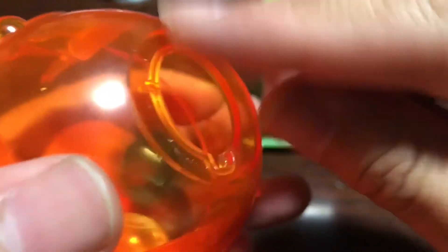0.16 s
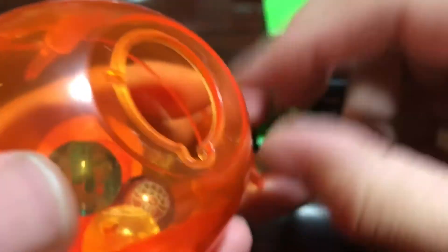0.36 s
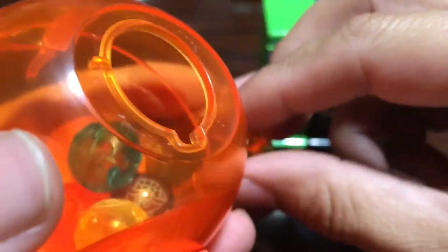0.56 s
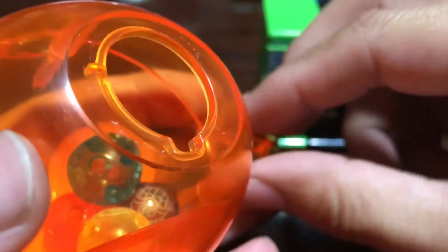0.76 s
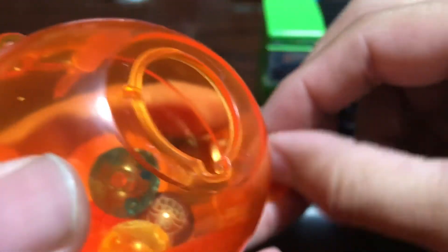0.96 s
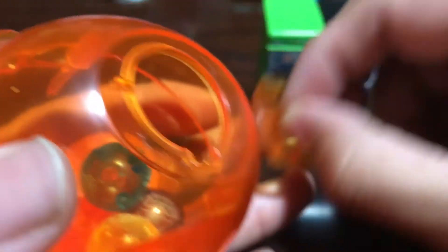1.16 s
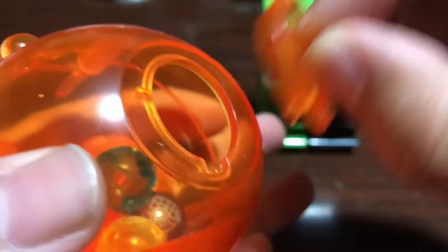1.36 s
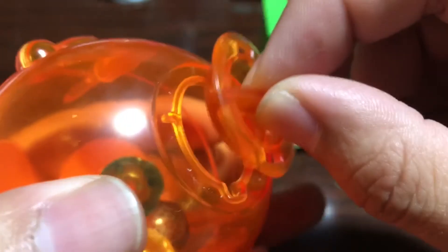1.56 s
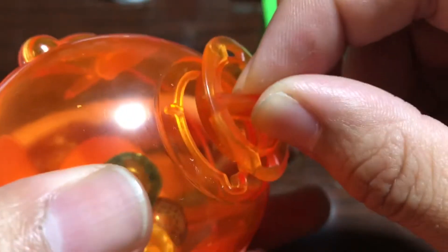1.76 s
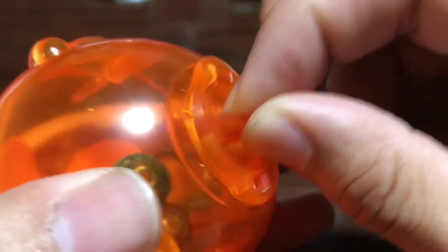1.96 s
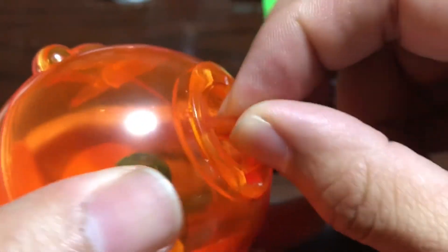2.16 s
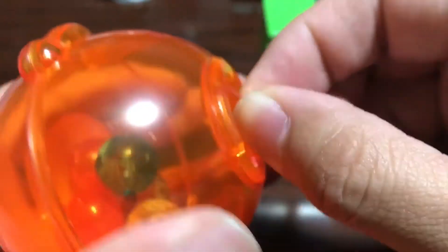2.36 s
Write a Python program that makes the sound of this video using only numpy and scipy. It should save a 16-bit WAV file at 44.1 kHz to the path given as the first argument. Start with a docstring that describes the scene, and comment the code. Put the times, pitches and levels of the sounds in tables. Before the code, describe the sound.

Small plastic balls clatter inside a hollow plastic dome, then a plastic cap snaps shut

```python
"""A small plastic ball scrapes through the tight port of a hollow plastic dome, while fingers rub on the shell.
It drops in and rattles against the shell and other balls; they roll and rattle again as the toy is tilted.
Then a plastic cap taps the rim of the port and is pressed home. It is heard close up, in a quiet small room.
Each blow is a sum of dying tones, a burst of coloured noise, a crack and the note of the air in the dome.
Rubbing, scraping and the still room are coloured noise; rolling is a shower of tiny blows."""
import sys
import numpy as np
from scipy import signal
from scipy.fft import rfft, irfft, next_fast_len
from scipy.io import wavfile
from scipy.ndimage import uniform_filter1d

SR = 44100
rng = np.random.default_rng(int(sys.argv[2]) if len(sys.argv) > 2 else 0)


def log_audio(samples):
    """Write samples as a 16-bit WAV file to the path given in sys.argv[1]."""
    # one column per channel
    frames = np.atleast_2d(samples).T
    # limit to full scale, then quantise
    limited = np.clip(frames, -1, 1)
    pcm = np.round(limited * 32767).astype(np.int16)
    wavfile.write(sys.argv[1], SR, pcm)


N = 105840   # length of the scene in samples

# main tones (modes) of the dome: (pitch [Hz], level [dB], time to fall by 60 dB [s])
DOME_MODES = [(1499, -0.5, 0.027), (1786, -8.5, .025), (2349, -1, 0.024), (2634, -1, .02),
              (2870, 0.5, 0.017), (3553, -1, .022), (4110, 1.5, 0.02), (4580, -11, .04), (5400, -2.5, .017),
              (6320, -2.5, .017), (7090, -6, .02), (7850, -5.5, 0.018), (9100, -2, 0.012)]
# how the dome rings: its modes, fall time of the crowd of brief modes [s], levels of crowd and air note [dB]
SHELL = dict(modes=DOME_MODES, crowd_t60=0.02, crowd_db=-1, cavity_db=-18)
SHELL_SPOT_Q, CAP_SPOT_Q = 1.7, 3.5   # how sharply a struck spot favours its pitch, on each body


def from_db(db):
    """Turn decibels into a gain."""
    return 10 ** (np.asarray(db) / 20)


def unit(x):
    """Scale to an energy of one."""
    return x / np.sqrt(np.sum(x ** 2) + 1e-20)


def rms_one(x):
    """Scale to an rms (average strength) of one."""
    return unit(x) * np.sqrt(len(x))


def coloured(x, points):
    """Filter to follow a spectrum, with the response as early as possible (minimum phase)."""
    size = 2 * next_fast_len(len(x))
    hz, db = np.transpose(points)
    grid = np.maximum(np.fft.rfftfreq(size, 1 / SR), 1)
    gain = from_db(np.interp(np.log(grid), np.log(hz), db))
    # folding the cepstrum forward in time keeps any sound from starting before its cause
    cepstrum = irfft(np.log(gain))
    cepstrum[1:size // 2] *= 2
    cepstrum[size // 2 + 1:] = 0
    response = np.exp(rfft(cepstrum))
    return irfft(rfft(x, size) * response)[:len(x)]


def shelved(x, bass_db, treble_db):
    """Set bass and treble: a heavy contact lifts the bass, a hard one the treble."""
    # the bass change fades out from 790 to 1650 Hz; the treble change fades in from 3440 to 8200 Hz
    return coloured(x, [(790, bass_db), (1650, 0), (3440, 0), (8200, treble_db)])


def radiated(x, edge_hz):
    """Weaken what lies below the edge, since a small body is a poor source of bass."""
    return signal.sosfilt(signal.butter(2, edge_hz, "high", fs=SR, output="sos"), x)


def flutter(size):
    """Random wavering, smoothed over so many samples, with an rms of one."""
    return rms_one(uniform_filter1d(rng.standard_normal(N), size=size))


def favoured(x, hz, q):
    """The struck spot lifts one region of pitch, broadly enough not to ring by itself."""
    spot_db = 7.5
    w, lift = 2 * np.pi * hz / SR, from_db(spot_db / 2)
    width, centre = np.sin(w) / (2 * q), -2 * np.cos(w)
    numerator = [1 + width * lift, centre, 1 - width * lift]
    denominator = [1 + width / lift, centre, 1 - width / lift]
    return signal.lfilter(numerator, denominator, x)


def add(out, s, sound):
    """Mix a sound in at a time in seconds, cutting off what falls outside the scene."""
    start = int(s * SR)
    sound, start = sound[max(-start, 0):], max(start, 0)
    out[start:start + len(sound)] += sound[:max(N - start, 0)]


def dying(t, t60):
    """A gain that falls by 60 dB in t60 seconds."""
    return from_db(-60 * t / t60)


def knock(modes, crowd_t60, crowd_db, cavity_db, s):
    """One blow: main modes of uneven strength, a crowd of brief modes, a crack and the note of the cavity."""
    # the crowd of short-lived modes between the main ones: (pitch [Hz], level per Hz [dB])
    crowd_colour = [(40, -50), (160, -19.5), (350, -23), (750, -10), (1500, -7), (1950, -7), (2500, -3.5),
                    (4200, 0), (6000, -2), (9000, -9), (11000, -11), (16000, -18.5)]
    # note of the air in the dome, which sinks as the cap closes the port: (time [s], pitch [Hz])
    cavity_pitch = [(.5, 711.6), (1.56, 747), (1.6, 714), (1.72, 660), (1.985, 610), (2.035, 512),
                    (2.066, 397)]
    mode_spread_db, crack_db = 3.5, -26
    mode_shift = 0.008   # grip and ball positions detune the modes from blow to blow (share of the pitch)
    contact_s, cavity_t60_s = .0012, 0.017   # a blow chatters for contact_s before its crowd dies away
    shell_edge_hz, port_edge_hz = 860, 227   # below these the shell and the port radiate little

    t = np.arange(SR // 16) / SR
    hz, db, t60 = np.transpose(modes)[:, :, None]
    strength = from_db(db + mode_spread_db * rng.standard_normal(hz.shape))
    strength = strength * (-1) ** np.arange(len(hz))[:, None]   # neighbouring modes start in opposite directions
    hz = hz * (1 + mode_shift * rng.standard_normal(hz.shape))
    ring = np.sum(strength * np.sin(2 * np.pi * hz * t) * dying(t, t60), axis=0)

    cavity_hz = np.interp(s, *np.transpose(cavity_pitch))
    cavity = np.sin(2 * np.pi * cavity_hz * t) * dying(t, cavity_t60_s)
    chatter = rng.standard_normal(len(t)) * dying(np.maximum(t - contact_s, 0), crowd_t60)
    crowd = unit(coloured(chatter, crowd_colour))
    crack = unit(coloured(1. * (t == 0), crowd_colour))   # a single click

    blow = unit(radiated(ring, shell_edge_hz)) + from_db(crowd_db) * crowd + from_db(crack_db) * crack
    return blow + from_db(cavity_db) * unit(radiated(cavity, port_edge_hz))


def blows(hits, body, spot_q):
    """Play a table of blows on one body; each level is the rms over 2 ms before bass and treble are set."""
    out = np.zeros(N)
    for s, db, bass_db, treble_db, spot_hz in hits:
        blow = favoured(knock(s=s, **body), spot_hz, spot_q)
        blow = unit(blow) * np.sqrt(.002 * SR)
        add(out, s, from_db(db) * shelved(blow, bass_db, treble_db))
    return out


def still_air():
    """The still room, a steady noise that is mostly low rumble."""
    # colour of the noise: (pitch [Hz], level per Hz [dB])
    air_colour = [(20, -24), (52, 2), (80, -3.5), (130, -5.5), (250, -7.5), (450, -16), (1100, -21),
                  (3200, -25), (16000, -32.5)]
    air_db = -67
    # one extra second at the start is dropped, so that the filter has settled
    noise = coloured(rng.standard_normal(N + SR), air_colour)[SR:]
    return from_db(air_db) * rms_one(noise)


def room(x):
    """A faint, dull tail from the walls, made by spreading the sound over dying noise."""
    # colour of the tail: (pitch [Hz], level [dB])
    room_colour = [(400, -4), (800, 2), (2500, 0.5), (4200, -5), (7000, -6), (16000, -8.5)]
    t60_s, delay_s, room_db = 0.27, 0.012, -19.5   # the level holds before the colouring
    t = np.arange(SR // 2) / SR
    tail = rng.standard_normal(len(t)) * dying(t, t60_s) * (t > delay_s)
    return from_db(room_db) * signal.fftconvolve(x, coloured(unit(tail), room_colour))[:N]


def rubbing():
    """Skin and plastic slide on the shell: each slide swells and fades as a grainy hiss, under uneven pressure."""
    # the slides: (start [s], end [s], level at the middle [dB])
    rubs = [(-.05, 0.264, -64), (0.343, 0.59, -66), (0.448, .77, -57), (1.627, 1.796, -64.5),
            (1.848, 1.978, -64.5), (1.941, 2.022, -58.5), (1.969, 1.985, -47.5), (2.022, 2.067, -44),
            (2.236, 2.38, -60.5), (2.369, 2.448, -51)]
    # colour of the hiss: (pitch [Hz], level [dB])
    rub_colour = [(200, -12), (700, 4), (1100, -3), (3000, -4.5), (4500, -0.5), (6000, -3.5), (8000, -3),
                  (11000, -9.5), (16000, -6.5)]
    grain_db, uneven_db = 2, 1   # strength of the fast and the slow wavering
    pressure = np.zeros(N)
    for start, end, db in rubs:
        swell = np.sin(np.linspace(0, np.pi, max(int((end - start) * SR), 2)))
        add(pressure, start, from_db(db) * swell)
    grain = from_db(grain_db * flutter(size=90) + uneven_db * flutter(size=700))
    return pressure * rms_one(coloured(grain * rng.standard_normal(N), rub_colour))


def catching():
    """The held ball or a finger catches on the shell, each time with a small blow."""
    # the catches: (time [s], level [dB], bass [dB], treble [dB], favoured pitch [Hz])
    ticks = [(.0278, -53.5, 21, 1, 1370), (.0655, -48, 15.5, -2, 1500), (.1170, -47.5, -9, 3.5, 6100),
             (.1802, -43, 4, -1, 4300), (2.3240, -58.5, 22.5, 9, 343), (2.3367, -55, 12, -16, 2270)]
    return blows(ticks, SHELL, SHELL_SPOT_Q)


def cap_tapping():
    """The loose cap taps the rim of the port and rings with its own modes."""
    # the taps: (time [s], level [dB], bass [dB], treble [dB], favoured pitch [Hz])
    taps = [(1.5586, -19.5, -6.5, 0.5, 4030), (1.5936, -42, -3, -16.5, 1500), (1.6000, -46, 4, -16.5, 1485),
            (1.6711, -49, 9, -18, 686), (1.7080, -65, 19.5, -2.5, 650)]
    # modes of the loose cap: (pitch [Hz], level [dB], time to fall by 60 dB [s])
    loose_modes = [(1000, -12, .006), (1540, -4.5, 0.0047), (2236, 3.5, 0.02), (3030, 2, 0.0064),
                   (4190, 2, 0.0096), (4580, 0, 0.017), (5600, -5, .008), (6510, -4.5, 0.017),
                   (8150, -0.5, 0.0085)]
    loose_cap = dict(modes=loose_modes, crowd_t60=.011, crowd_db=-5.5, cavity_db=-11)
    return blows(taps, loose_cap, CAP_SPOT_Q)


def cap_snapping():
    """The cap snaps into the port and beds down; clamped in the rim, it rings with other modes."""
    # the snaps: (time [s], level [dB], bass [dB], treble [dB], favoured pitch [Hz])
    snaps = [(1.9725, -34, 13.5, 2, 6530), (1.9864, -18, 4, -5, 3900), (2.0295, -28.5, 6, -1.5, 6000),
             (2.0343, -27, 11.5, -9, 555), (2.0550, -40.5, 15, -12, 374), (2.0660, -32.5, 16.5, -16, 1000),
             (2.0801, -40.5, 3, -24, 1470), (2.1192, -47.5, -1, -19.5, 2300)]
    # modes of the cap clamped in the rim: (pitch [Hz], level [dB], time to fall by 60 dB [s])
    seated_modes = [(1162, -3.5, 0.013), (1797, 3, 0.0086), (3770, 1, 0.01), (4610, 0.5, 0.013),
                    (5430, -7.5, 0.0079), (6480, 7, 0.0091), (8630, 2, 0.01)]
    seated_cap = dict(modes=seated_modes, crowd_t60=0.014, crowd_db=-1, cavity_db=-15)
    return blows(snaps, seated_cap, CAP_SPOT_Q)


def scraping():
    """Tiny slips of the ball in the tight rim excite a narrow, high hiss until it drops through."""
    # how hard the ball scrapes: (time [s], level [dB])
    scrape = [(0, -68), (.08, -76), (.12, -55), (.16, -65.5), (.183, -50.5), (.205, -68), (.25, -69.5)]
    # colour of the hiss: (pitch [Hz], level [dB])
    scrape_colour = [(400, -21), (720, 1.5), (1100, -21), (3700, -10), (4400, 2), (5100, -13), (5900, 7.5),
                     (6800, -4.5), (10000, -29)]
    s, db = np.transpose(scrape)
    pressure = np.interp(np.arange(N) / SR, s, from_db(db), right=0)
    slips = rng.standard_normal(N) * rng.exponential(1, N)
    return pressure * rms_one(coloured(slips, scrape_colour))


def rolling():
    """Many tiny contacts, each at one of four spots, keep the dome ringing while the balls move."""
    # balls roll and chatter between blows: (start [s], end [s], level at start [dB], level at end [dB])
    rolls = [(0.255, 0.316, -33.5, -31.5), (.313, 0.379, -39.5, -43), (0.556, 0.639, -36.5, -52),
             (0.658, 0.667, -47.5, -55), (0.706, 0.75, -46.5, -70.5)]
    contacts_per_s, treble_db = 700, -10
    rolled_shell = dict(SHELL, crowd_db=-5.5)   # light contacts wake mostly the main modes
    out, t = np.zeros(N), np.arange(SR // 4) / SR
    for start, end, start_db, end_db in rolls:
        length = end - start
        touching = rng.random(len(t)) < contacts_per_s / SR
        contacts = touching * rng.standard_normal(len(t)) * (t < length)
        level = from_db(np.interp(t, [0, length], [start_db, end_db]))
        force = unit(contacts) * np.sqrt(abs(length) * SR) * level
        spots = rng.integers(0, 4, len(t))
        for spot in np.unique(spots):
            ring = unit(shelved(knock(s=start, **rolled_shell), 0, treble_db))
            add(out, start, signal.fftconvolve(force * (spots == spot), ring))
    return out


def ball_hitting():
    """A ball strikes the shell or another ball and sets the dome ringing."""
    # the strikes: (time [s], level [dB], bass [dB], treble [dB], pitch that the struck spot favours [Hz])
    ball_hits = [(.2036, -29.5, 9.5, -2.5, 2900), (.2495, -9.5, -5, 5, 3270), (.2610, -23.5, 8, -3, 3060),
                 (.2705, -41, -10, 11, 9100), (.2762, -18, -51, 2.5, 3830), (.2808, -33, -11, 2, 3860),
                 (.2898, -26, -7, 14, 4000), (.2993, -17.5, 8, 12, 4000), (.3100, -32.5, 6, 7, 4200),
                 (.3199, -14, -7, -5.5, 2900), (.3293, -28.5, 0, -14, 2870), (.3370, -27.5, -22, -7, 2770),
                 (.3408, -25, 2, -2.5, 3900), (.3654, -25, -15, -8, 3080), (.3728, -33, 13.5, -16, 4100),
                 (.5251, -14.5, -14, 0, 3450), (.5486, -18.5, -7.5, -3.5, 3440),
                 (.5595, -35, 14.5, -9, 7200), (.5637, -27.5, 1.5, -3, 7460), (.5731, -35, -7, 1, 3900),
                 (.5954, -26.5, 3, -9.5, 3200), (.6034, -28, 2.5, -8, 2600), (.6125, -40, 17, -12, 3710),
                 (.6274, -39, 6.5, -22, 3750), (.6548, -38.5, 10.5, -16, 2384),
                 (.6885, -34.5, 2.5, -30, 3100), (.6960, -46, 5, -25, 2670),
                 (.7008, -29.5, -2.5, -12, 3300), (.7160, -40.5, 13, -12, 2400), (.7195, -42, 8, 0.5, 5600),
                 (.7302, -41.5, 7, -7, 3870), (1.0024, -48.5, 2.5, 4, 4130), (1.0638, -55, 19.5, 6.5, 4000),
                 (1.1243, -53.5, 17, -1.5, 4010)]
    return blows(ball_hits, SHELL, SHELL_SPOT_Q)


def scene():
    """Fingers, cap and balls in the room, over its still air."""
    fingers = rubbing() + catching()
    cap = cap_tapping() + cap_snapping()
    balls = scraping() + rolling() + ball_hitting()
    toy = fingers + cap + balls
    return (still_air() + room(toy) + toy)[None]


def record(dry):
    """The highest peaks overload and are cut flat, then the top of the treble is cut."""
    cutoff_hz = 16750   # from here up, at least 70 dB weaker
    clipped = np.clip(dry, -.8, .8)
    return signal.sosfilt(signal.cheby2(16, 70, cutoff_hz, fs=SR, output="sos"), clipped)


dry = scene()
out = record(dry)
log_audio(out)
```